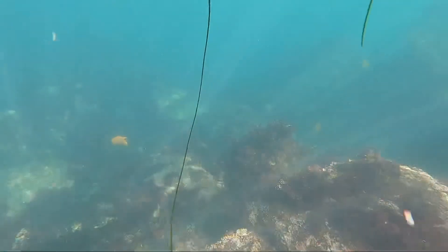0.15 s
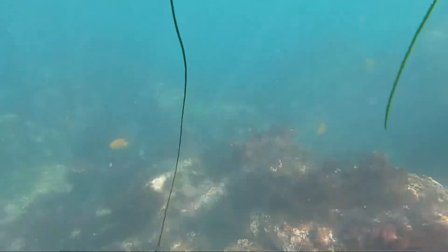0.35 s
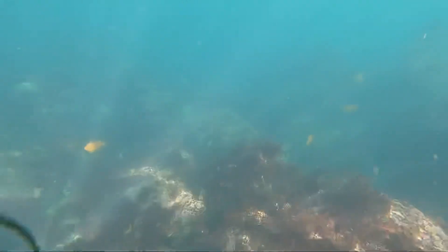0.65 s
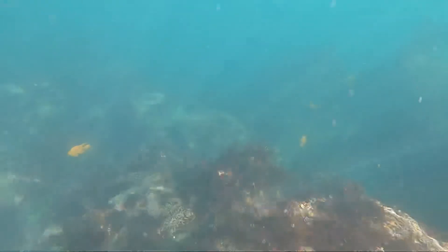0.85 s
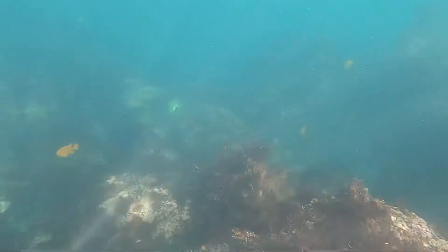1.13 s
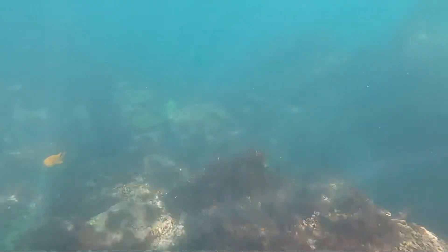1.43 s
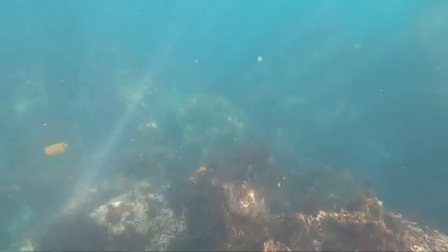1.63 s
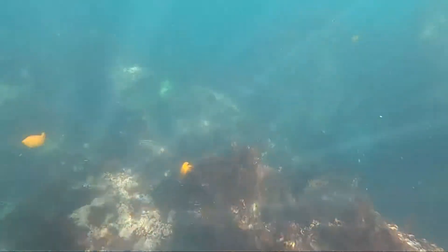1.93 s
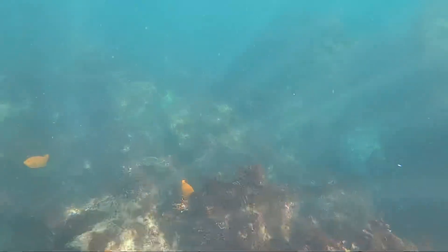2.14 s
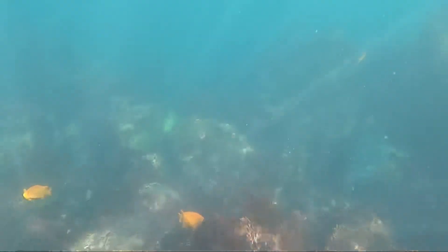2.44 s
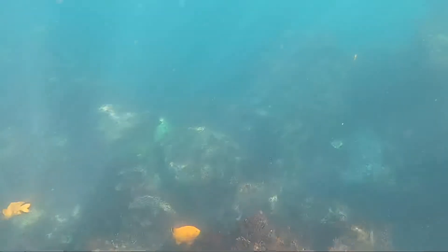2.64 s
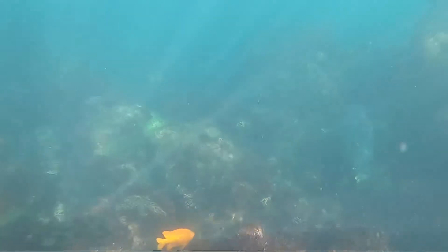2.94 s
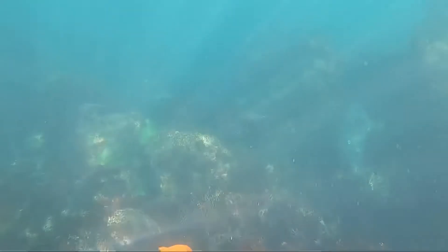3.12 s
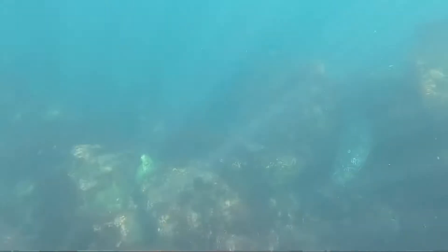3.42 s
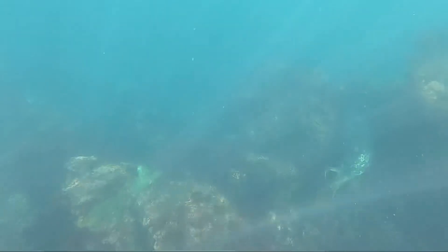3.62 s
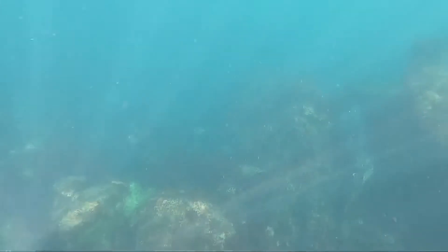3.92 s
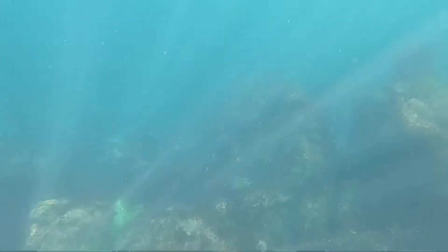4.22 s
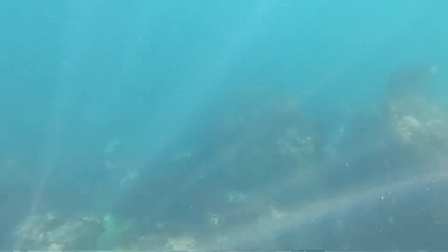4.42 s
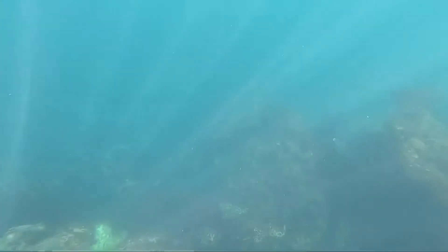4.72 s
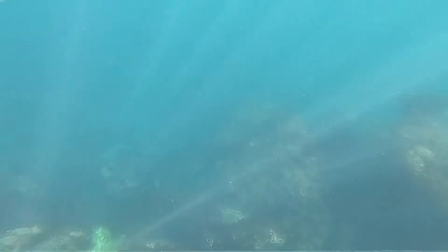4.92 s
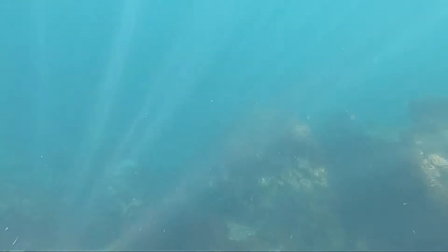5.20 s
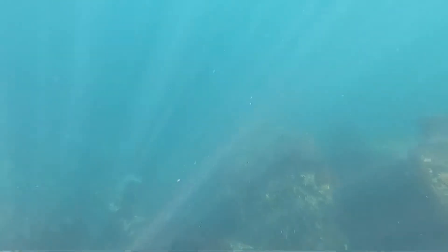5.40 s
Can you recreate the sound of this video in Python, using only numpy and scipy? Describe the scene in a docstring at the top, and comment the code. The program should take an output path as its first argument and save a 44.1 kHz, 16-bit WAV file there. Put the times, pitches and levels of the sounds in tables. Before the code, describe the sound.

A submerged camera in a sealed housing hears a rocky reef in muffled, slightly boxy stereo. A low, lumpy rumble of surging water and distant fish runs throughout, with soft slaps swelling against the shell. Over it lies a constant fine crackle of snapping shrimp, scattered with nearer, sharp dry clicks that ring briefly. From 0.27 to 0.45 s a hand knocks and scrapes the housing, the hardest bump at 0.45. Bright clicks burst near 0.77 s; small bumps and a soft rub follow at 0.95 and 1.4 to 2.0. Another rapid cluster of clacking knocks comes at 2.13 to 2.21. From about 1.54 s nearby fish give short, dull low thumps, irregular and frequent, with faint reef echoes; strong ones fall near 1.92, 3.56, 4.26, 5.03 and 5.41. Shrimp clicking grows dense from 3.2 s and keeps going until the end at about 5.5 s.

```python
"""Under water on a rocky reef, heard through the left and right ports of a sealed camera housing.
Surge and far fish rumble as shaped noise; near fish drum short low thumps, decaying sines with reef echoes.
A hand rubs and knocks the shell: grainy noise and single blows through resonances.
Snapping shrimp click near and far: pulses and sprays of noisy echoes that ring the housing."""
import sys
import numpy as np
from scipy import signal
from scipy.fft import rfft, irfft, next_fast_len
from scipy.io import wavfile
from scipy.ndimage import map_coordinates

SR = 44100
rng = np.random.default_rng(int(sys.argv[2]) if len(sys.argv) > 2 else 0)


def wav_out(sig):
    """Save sig, one row per channel (or a flat mono array), as 16-bit PCM at SR to the path in sys.argv[1]."""
    wavfile.write(sys.argv[1], SR, np.round(np.clip(np.atleast_2d(sig).T, -1, 1) * 32767).astype(np.int16))


def boost_factor(decibels):
    """Convert a level in decibels to a linear amplitude factor."""
    exponent = np.asarray(decibels, float) / 20
    return 10 ** exponent


N = 245195  # samples

# Water pushing on the housing and the far fish behind it: time_s, surge_db, drone_db
WATER_LEVELS = [(0.0, -28, -37), (0.23, -31.5, -44), (0.42, -24.5, -34.5), (0.84, -29, -34),
                (0.99, -28, -56.5), (1.16, -31, -42.5), (1.31, -35, -39), (1.45, -30.5, -36),
                (1.58, -31.5, -36.5), (1.95, -30, -36.5), (2.26, -33, -38.5), (2.49, -30, -39),
                (2.65, -32.5, -36), (3.13, -32.5, -40), (3.34, -30, -39.5), (3.58, -31.5, -43),
                (3.7, -37.5, -31), (3.82, -34.5, -38.5), (4.0, -32, -38), (4.24, -30.5, -38.5),
                (4.51, -31.5, -43), (4.77, -30, -44.5), (5.08, -34.5, -38), (5.31, -23, -36.5),
                (5.44, -33, -35.5), (5.56, -26, -43.5)]
# Spectrum of the surge, relative: freq_hz, density_db (per Hz)
SURGE_SPECTRUM = [(9, -25), (15, 1), (28, 6), (65, -1), (125, -3), (180, -23), (250, -23), (420, -120)]
# Shell resonances under a rubbing or knocking hand, for one of two passes: freq_hz, width_hz, relative_db
RUB_MODES = [(330, 105, 2), (519.6, 201, -0.5)]
# Higher shell resonances that rasp and clack, for one of two passes: freq_hz, width_hz, relative_db
RASP_MODES = [(620, 230, -3), (1000, 250, 0), (1600, 450, -5)]
SIDES = np.array([[1], [-1]])  # left port, right port


def unit(x):
    """Scale to rms 1."""
    return x / np.sqrt(np.mean(x ** 2) + 1e-20)


def along(points, hz):
    """Read (Hz, value) points on a log frequency axis."""
    f, v = np.transpose(points)
    return np.interp(np.log(hz + 1), np.log(f + 1), v)


def curves(rows):
    """One dB value per sample for each column after the time; -120 outside the rows."""
    s, *cols = np.transpose(rows)
    t = np.arange(N) / SR
    return np.array([np.interp(t, s, c, left=-120, right=-120) for c in cols])


def wobble(rate):
    """A smooth random curve, rate knots a second."""
    knots = rng.standard_normal(int(N * rate / SR) + 4)
    return map_coordinates(knots, [np.arange(N) * rate / SR])


def filtered(x, response):
    """Pass x through a complex response of frequency."""
    m = next_fast_len(N + 8192)  # room for the ringing
    return irfft(rfft(x, m) * response(np.fft.rfftfreq(m, 1 / SR)), m)[..., :N]


def modes(table):
    """Causal response of (Hz, width Hz, dB) resonances with alternating signs."""
    def response(f):
        total = 0
        for k, (c, w, db) in enumerate(table):
            total = total + (-1) ** k * boost_factor(db) * 1j * f * w / (c * c - f * f + 1j * f * w)
        return total
    return response


def steep(table):
    """The resonances passed twice, scaled so that one blow peaks at 1."""
    twice = lambda f: modes(table)(f) ** 2
    peak = np.abs(filtered(np.arange(N) == 0, twice)).max()
    return lambda f: twice(f) / peak


def blows(s, db):
    """A train of one-sample blows."""
    return np.bincount(np.round(s * SR).astype(int), boost_factor(db), N)[:N]


def surging():
    """Surge level in dB: a slow swell with short slaps of water on it."""
    # Slaps on the housing: crest_s, crest_db, half_length_s
    slap_rows = [(0.01, -24.5, 0.015), (0.164, -29, 0.029), (0.473, -24.5, 0.099), (0.565, -36.5, 0.019),
                 (0.867, -19.5, 0.041), (0.962, -19.5, 0.018), (1.604, -22.5, 0.036), (2.056, -25, 0.025),
                 (2.195, -18.5, 0.052), (2.504, -28, 0.034), (2.735, -27.5, 0.02), (2.87, -30.5, 0.052),
                 (3.047, -19.5, 0.018), (3.199, -24, 0.0059), (3.618, -29, 0.077), (3.8, -21.5, 0.0083),
                 (3.891, -29, 0.02), (4.015, -31, 0.015), (4.368, -31, 0.05), (4.537, -21, 0.018),
                 (4.619, -28.5, 0.012), (4.936, -23, 0.027), (5.202, -29, 0.017), (5.392, -29.5, .03),
                 (5.489, -22, 0.0088)]
    t = np.arange(N) / SR
    slaps = sum(boost_factor(db) * np.exp(-((t - s) / half) ** 2) for s, db, half in slap_rows)
    return 20 * np.log10(boost_factor(curves(WATER_LEVELS)[0]) + slaps)


def water():
    """Surge presses in lumps of low noise; far fish blur into a lumpy drone."""
    # Spectrum of the far fish, relative: freq_hz, density_db (per Hz)
    drone_spectrum = [(76, -18), (130, -4.5), (171, -11), (247, -2.5), (285, -2.5), (309, -8.5),
                      (380, -17.5), (632, -33.5), (1100, -33.5), (1430, -65), (2420, -120)]
    surge = boost_factor(1.54 * wobble(14)) * rng.standard_normal(N)
    surge = filtered(surge, lambda f: boost_factor(along(SURGE_SPECTRUM, f)))
    drone = boost_factor(3 * wobble(35)) * rng.standard_normal(N)
    drone = filtered(drone, lambda f: boost_factor(along(drone_spectrum, f)))
    return boost_factor(surging()) * unit(surge) + boost_factor(curves(WATER_LEVELS)[1]) * unit(drone)


def eddies():
    """Turbulence follows the surge and pushes the two ports in opposite directions."""
    push = filtered(rng.standard_normal(N), lambda f: boost_factor(along(SURGE_SPECTRUM, f)))
    return SIDES * boost_factor(surging() - 26.0) * unit(push)


def sliding():
    """Rub, rasp and hiss levels of the hand in dB: each stroke sets in, holds and fades."""
    # Strokes over the housing: start_s, length_s, rub_db, rasp_db, hiss_db
    strokes = [(0, 0.14, -43, -55, -76), (0.332, 0.32, -42.5, -45, -72), (0.408, 0.065, -35, -43, -53),
               (0.931, 0.025, -38, -46, -68), (1.457, 0.55, -39, -69, -48.5),
               (2.136, 0.081, -35, -49, -62.5), (2.447, 0.0056, -37, -45.5, -78),
               (2.564, .5, -53, -82, -81)]
    grip_db_per_s, let_go_db_per_s = 305.5, 172.5
    t = np.arange(N) / SR
    total = 0
    for s, length, *db in strokes:
        fade_db = grip_db_per_s * np.clip(s - t, 0, 1) + let_go_db_per_s * np.clip(t - s - length, 0, 1)
        total = total + boost_factor(np.c_[db] - fade_db)
    return 20 * np.log10(total)


def rubbing():
    """Skin drags over the shell in uneven grains, exciting low, middle and high resonances."""
    # Shell resonances that hiss, for one of two passes: freq_hz, width_hz, relative_db
    hiss_modes = [(1440, 170, 0), (1745, 70, 1)]
    grains = wobble(60)
    layers = zip(sliding(), [RUB_MODES, RASP_MODES, hiss_modes], [.08, .35, .3], [1.4, 3.5, .8])
    out = 0
    for db, table, apart, grain_db in layers:
        # apart is the share of noise that is opposite at the two ports
        noise = [[1, apart], [1, -apart]] @ rng.standard_normal((2, N))
        out = out + boost_factor(db) * unit(filtered(boost_factor(grain_db * grains) * noise, steep(table)))
    return out


def knocking():
    """A knock rings the shell, thuds late through its heavy body and clacks its chattering wall."""
    # Knocks on the housing: time_s, level_db, thud_db and clack_db (both relative to level_db)
    knock_rows = [(0.271, -21, -12, -8), (0.313, -23.5, 0, -19), (0.382, -17.5, 4, -32),
                  (0.419, -18.5, -1, -9), (0.448, -10.5, -6, -6.5), (0.703, -41, 9.5, 10),
                  (0.939, -43, 28.5, -8), (0.956, -23.5, 5, -2.5), (1.361, -31.5, 8, -26),
                  (1.409, -37, 19, -27), (1.425, -23, 5, -8.5), (1.468, -19.5, -13, -22),
                  (1.57, -24, 10, -50), (2.126, -21, 10, 1.5), (2.178, -19, -7, 0), (2.194, -20.5, 13, 4.5),
                  (2.21, -17, 4.5, -1), (2.45, -41, 24, 3), (3.339, -47, 0, 11), (3.499, -55, 1, 10),
                  (3.59, -52, 0, 10), (3.704, -55, 3, 8), (3.789, -37, 17.5, -26), (4.006, -33.5, 3.5, -28),
                  (4.514, -45, 30.5, -40), (4.753, -39, 16, -35), (4.896, -47.5, 15, 19.5),
                  (5.027, -25.5, 7, 2), (5.408, -27.5, 5, 5)]
    thud_lag_s = 0.00317
    rattle_db, rattle_t60_s = -17.5, 0.021
    s, db, thud_db, clack_db = np.transpose(knock_rows)
    thud = filtered(blows(s + thud_lag_s, db + thud_db), steep([(109.6, 108, 0)]))
    knock = filtered(blows(s, db), steep(RUB_MODES))
    clack = blows(s, db + clack_db)
    chatter = boost_factor(rattle_db - 60 * np.arange(SR // 40) / SR / rattle_t60_s)
    rattle = signal.fftconvolve(clack, chatter)[:N] * rng.standard_normal(N)
    clack = filtered(clack + rattle, steep(RASP_MODES))
    soft_contact = lambda f: 1 / (1 + 1j * f / 2300) ** 4  # takes off the treble
    return -filtered(thud + knock + clack, soft_contact)


def fish():
    """Each near thump is one twitch of a swim bladder: a few cycles that swell and die."""
    # Near thumps: start_s, level_db, pitch_hz
    thump_rows = [(0.678, -36, 235), (1.148, -28, 229), (1.392, -25.5, 176), (1.539, -10, 269),
                  (1.829, -19, 220), (1.918, -9.5, 236), (1.978, -30, 312), (2.073, -14, 250),
                  (2.239, -15, 260), (2.429, -12.5, 191), (2.576, -23, 210), (2.626, -28, 276),
                  (2.706, -12.5, 238), (2.756, -28, 260), (2.927, -18, 193), (2.993, -26, 296),
                  (3.042, -16, 234), (3.183, -14.5, 242), (3.328, -14.5, 235), (3.556, -6.5, 244),
                  (3.602, -26, 228), (3.637, -16.5, 198), (3.646, -14, 251), (3.704, -20.5, 256),
                  (3.73, -26.5, 256), (3.829, -26, 248), (3.865, -26.5, 240), (4.086, -33, 283),
                  (4.178, -24.5, 255), (4.255, -10.5, 235.4), (4.318, -29, 200), (4.388, -13.5, 248),
                  (4.538, -15.5, 252), (4.607, -23.5, 213), (4.94, -12.5, 258), (5.029, -6.5, 178.6),
                  (5.139, -21.5, 256), (5.241, -26.5, 268), (5.344, -26.5, 260), (5.41, -8, 209),
                  (5.45, -23, 179)]
    out = np.zeros(N + SR)
    t = np.arange(SR // 20) / SR - .0053  # zero at the crest
    rise = np.exp(-(t / 0.0034) ** 2)
    fall = 0.62 * np.exp(-(t / 0.0027) ** 2) + 0.36 * np.exp(-t / 0.011)
    swell = np.where(t < 0, rise, fall) * np.minimum(np.arange(len(t)) / 90, 1)
    for s, db, hz in thump_rows:
        out[round(s * SR):][:len(t)] -= boost_factor(db) * swell * np.sin(2 * np.pi * hz * t)
    return out[:N]


def reef(x):
    """Thumps come back off the reef as a dying spray of echoes."""
    echo_db, echo_t60_s = -14.5, 0.11
    t = np.arange(SR // 2) / SR
    tail = boost_factor(-60 * t / echo_t60_s) * np.minimum(t / 0.0033, 1) * rng.standard_normal(len(t))
    return boost_factor(echo_db) * signal.fftconvolve(x, tail / np.linalg.norm(tail))[:N]


def far_crackle():
    """Times, levels and colours of 1000 far snaps, and the gain of the hiss the farthest merge into."""
    # Far crackle: time_s, base_db
    crackle_rows = [(0.0, -57), (0.17, -54.5), (0.56, -57.5), (0.74, -57.5), (0.94, -57), (1.31, -53.5),
                    (1.45, -53), (1.84, -54), (2.12, -54.5), (2.52, -57), (3.08, -54.5), (3.24, -50.5),
                    (3.41, -51), (3.83, -57), (4.55, -52.5), (4.81, -52.5), (5.1, -54), (5.56, -53)]
    base_db = curves(crackle_rows)[0]
    chance = rng.random((1000, 3))
    far_s = chance[:, 0] * (N - 1) / SR
    clumped_db = base_db + 1.5 * wobble(7)  # louder and softer clusters
    far_db = clumped_db[np.round(far_s * SR).astype(int)] - 6.4 * np.log(chance[:, 1] + 0.025)
    far_hz = 1200 * 9 ** chance[:, 2]  # rocks and distance give every far snap its own colour
    bed = boost_factor(base_db - 18.5 + 1.5 * wobble(12))
    return far_s, far_db, far_hz, bed


def two_ports(noise, near):
    """Noise reaches the ports partly alike, depending on frequency; near clicks are added to both parts."""
    # Left-right likeness of the noise: freq_hz, likeness (-1 to 1)
    likeness = [(800, 0.49), (1500, 0.4), (3000, 0.13), (6000, 0.42), (9000, 1), (12500, 1)]
    turn = lambda f: np.arccos(np.clip(along(likeness, f), -1, 1)) / 2
    parts = noise + np.array([[1.3], [.7]]) * near
    shared, apart = filtered(parts, lambda f: np.array([np.cos(turn(f)), 1j * np.sin(turn(f))]))
    return np.array([shared + apart, shared - apart])


def ring(x, group):
    """One group of housing resonances at each port, scaled so that a blow peaks at 1 on average."""
    ports = [modes([(hz, w, port_db[side]) for hz, w, *port_db in group]) for side in range(2)]
    low_hz, top_hz = .8 * group[0][0], 1.15 * group[-1][0]  # the shell passes little outside
    edge = lambda u: 1 / (1 - u * u + 1.25j * u) ** 3
    both = lambda f: np.array([p(f) for p in ports]) * edge(-low_hz / (f + 1)) * edge(f / top_hz)
    peak = np.abs(filtered(np.arange(N) == 0, both)).max(axis=1).mean()
    return filtered(x, both) / peak


def shrimp():
    """Each snap is a click (too faint when far) and a spray of echoes off the rocks, ringing the housing."""
    # Near snaps: start_s, low_db, middle_db, high_db, top_db (one per resonance group),
    # late_db (late echoes, relative to each group's level)
    snaps = [(0.026, -46, -32, -29.5, -53, -35), (0.127, -35.5, -19.5, -20, -55.0, -42.5),
             (0.3175, -40.5, -50, -90.0, -77.5, -18.5), (0.3477, -56, -38, -47.5, -61.5, -25),
             (0.3964, -34, -37.5, -49.5, -66.5, -19), (0.4176, -39, -90.0, -89, -69, -34.0),
             (0.425, -36.5, -46, -41, -90.0, -26.5), (0.4373, -87, -42, -90.0, -73, -14.5),
             (0.4484, -35, -35, -36.0, -62, -27), (0.468, -88, -38, -43.5, -71, -27),
             (0.5068, -35, -37, -43, -59, -29), (0.5814, -53.5, -40, -34, -59, -36.5),
             (0.6656, -41, -41, -50, -71, -19), (0.7042, -36, -45.5, -56, -74.5, -34.0),
             (0.7662, -20.5, -20, -29, -52.5, -34), (0.776, -29, -90.0, -64, -90.0, -22),
             (0.7876, -24, -23.5, -21, -63, -25.5), (0.9016, -49, -43, -39, -65, -24),
             (0.9172, -51, -32.5, -40.5, -70, -26.5), (0.9292, -30, -28, -29.5, -54.5, -26.5),
             (0.9604, -36, -36, -43, -86.5, -37), (1.0474, -57, -38, -40.0, -61, -24),
             (1.058, -50, -44, -36, -62.5, -35.5), (1.065, -90.0, -52, -44, -57.5, -34.0),
             (1.2815, -24, -21.0, -39, -64, -31.0), (1.4424, -59, -32.5, -40.5, -65, -22),
             (1.4587, -51, -47, -41, -66, -39), (1.4839, -25, -29, -27.5, -59, -23.5),
             (1.557, -39, -36, -46, -76.0, -31), (1.5737, -44, -35.5, -43, -64, -21),
             (1.5885, -33, -33.5, -60, -68, -21), (1.6039, -35.5, -30, -34.5, -56, -32),
             (1.7418, -39, -38, -42.5, -71, -29), (1.7728, -34.5, -37, -56, -90.0, -33),
             (1.8306, -38, -51, -48, -81, -34.0), (1.8577, -43.5, -60, -58, -76, -23.0),
             (1.917, -40, -42, -51, -73.5, -20), (1.9554, -51, -30, -33.5, -65.5, -27),
             (1.9709, -44, -43, -49, -86, -32), (1.989, -44.0, -39, -57, -82, -33),
             (2.0062, -44, -34.5, -49.5, -71, -28), (2.0285, -39, -50, -49, -59.5, -37),
             (2.049, -39, -31.5, -57, -71.5, -25), (2.0775, -40.5, -38.0, -55, -76, -23),
             (2.1112, -41, -37, -52.5, -63, -16.0), (2.1292, -33.5, -35, -48, -67, -41),
             (2.133, -47, -57, -52, -54, -33), (2.164, -20.5, -24, -25.5, -52.0, -35.5),
             (2.1772, -29, -90.0, -90.0, -90.0, -31), (2.1943, -37, -48, -49.5, -73, -37),
             (2.2134, -32.5, -25.5, -38.5, -90.0, -41), (2.3696, -85, -45, -48, -62.5, -22),
             (2.4546, -34.5, -38, -67, -75, -35), (2.5136, -67, -38.5, -40.5, -67.5, -40),
             (2.5456, -46, -41, -41, -59.5, -18.0), (2.749, -89, -47.0, -50, -62, -37),
             (2.8027, -39.0, -31.5, -39.5, -78, -24.5), (2.8553, -16.5, -33.5, -39, -61.0, -26),
             (2.8757, -37, -52.0, -90.0, -88.0, -34.0), (2.888, -43.0, -46, -44, -78.5, -41),
             (2.9982, -52.0, -33, -33.5, -67, -34.0), (3.0285, -90.0, -49, -44, -59.5, -16.5),
             (3.0522, -49, -42, -38.5, -61, -22), (3.077, -44, -37, -90.0, -92, -20.0),
             (3.108, -47, -42, -43.5, -78, -21.5), (3.1148, -57, -47, -40.5, -60, -18.5),
             (3.1216, -90.0, -46, -35, -59, -31), (3.1448, -34.0, -33.5, -49, -61, -34.0),
             (3.277, -28, -34.5, -42.5, -65, -21.5), (3.3044, -35, -41, -44, -70.0, -28.0),
             (3.338, -30, -31.5, -40.5, -71, -25), (3.376, -28, -35.5, -50.5, -68, -26.5),
             (3.3877, -37.0, -35, -45, -71.0, -32), (3.431, -39.5, -41, -52, -69.0, -28.5),
             (3.4637, -52, -38.5, -58, -91, -21.5), (3.477, -42, -32, -48.5, -67.5, -34.0),
             (3.523, -27.5, -27.5, -35.5, -57, -23.5), (3.5322, -32.5, -32, -26.5, -48.5, -31),
             (3.5527, -39.5, -34, -34, -54.0, -31), (3.5964, -43, -35, -47, -63.5, -19.5),
             (3.6186, -39, -32, -49, -67, -34.0), (3.625, -88, -38, -37, -57.5, -40),
             (3.642, -61, -44, -42, -65.5, -35), (3.7031, -37.5, -58, -46, -78.5, -17.5),
             (3.7507, -39.5, -45, -36, -64, -32), (3.7914, -63, -55, -33, -69, -25),
             (3.848, -55, -35, -38.5, -90.0, -25), (3.9105, -55, -31, -36.5, -67, -26),
             (3.9854, -52, -36, -43, -74.5, -28), (4.1015, -48, -29.5, -38.5, -63, -28.5),
             (4.1093, -90.0, -53, -50.5, -64, -19), (4.114, -90.0, -36, -36, -58.5, -24.5),
             (4.131, -39, -36, -42, -60.5, -22), (4.1537, -40, -32, -42, -69.5, -22.5),
             (4.1706, -90.0, -28.5, -52, -65.5, -21), (4.1937, -24, -29, -27.5, -55, -23),
             (4.264, -42.5, -32, -33, -56, -30), (4.3241, -38.5, -40, -37.5, -70, -31),
             (4.3496, -52, -44, -52, -56, -39), (4.4107, -74, -67, -45, -60, -28),
             (4.4362, -68, -55, -39.5, -59, -26), (4.5339, -52, -37.5, -34.5, -52, -34.0),
             (4.6589, -30.5, -23.5, -41, -59.5, -19.0), (4.6702, -90.0, -23.5, -33, -59, -26),
             (4.7075, -48, -48, -48, -57, -22.5), (4.7176, -46.0, -28.5, -27.5, -52.5, -36),
             (4.763, -90.0, -41, -35.5, -60, -26), (4.7985, -50.5, -35, -50.5, -87, -21),
             (4.8147, -45, -32.5, -35, -75, -26.5), (4.8278, -53, -42, -33, -51.5, -32.5),
             (4.884, -46, -37, -39.5, -60.5, -18), (4.8959, -18.5, -26.5, -42.5, -58, -27),
             (4.9115, -36, -90.0, -90.0, -90.0, -27), (4.926, -39, -42, -40, -62, -29.5),
             (4.9506, -47.5, -43, -44, -90.0, -35), (4.9898, -44, -31.5, -40.5, -60.5, -33.5),
             (5.0162, -90.0, -45, -35, -59.5, -18.5), (5.0277, -19, -44, -42.0, -63, -26),
             (5.1539, -44, -31.5, -36, -62, -27), (5.243, -90.0, -36.0, -46, -71.5, -37),
             (5.3556, -42, -39.5, -36.5, -67, -38.5), (5.4082, -30.5, -53, -42, -59, -22.5),
             (5.4395, -38, -33, -48.5, -90.0, -24), (5.4784, -32.5, -48, -43, -66, -38),
             (5.5117, -23.5, -26, -34, -54, -23)]
    # Housing resonances in four groups, relative: freq_hz, width_hz, left_db, right_db
    housing = [
        [(1403, 260, 12.5, 6), (2180, 620, -6.5, -10)],
        [(2564, 810, 6, -15), (3726, 800, 1, 4)],
        [(4400, 740, 2, 11), (5630, 1580, 3.5, -1.5), (7770, 1400, -9, -27)],
        [(9470, 1400, 2, -3.5), (12900, 1800, -1, -6.5)],
    ]
    claw_db, claw_s = -26.5, 0.0013  # the closing claw ticks softly just before its bubble bursts
    bounce_db, bounce_s = -3, .0028  # returns off the nearest rocks, within this time
    s, *ring_db, late_db = np.transpose(snaps)
    burst_s = s + claw_s
    far_s, far_db, far_hz, bed = far_crackle()
    rasp = boost_factor(sliding()[1] - 31)  # a rasping hand shakes all but the top group too
    t = np.arange(SR // 16) / SR
    early, late = boost_factor(-20.0 - 60 * t / 0.0059), boost_factor(-60 * t / 0.063)
    out = 0
    for k, (group, far_gain_db) in enumerate(zip(housing, [-0.5, 2.5, -2.5, -20.5])):
        near = blows(burst_s, ring_db[k]) + blows(s, ring_db[k] + claw_db)
        lag_s = bounce_s * rng.random((len(s), 2)) ** 2
        near = near + blows(burst_s + lag_s[:, 0], ring_db[k] + bounce_db)
        near = near - blows(burst_s + lag_s[:, 1], ring_db[k] + bounce_db)
        colour_db = -32 * np.log2(far_hz / group[0][0]) ** 2
        distant = blows(far_s, far_db + far_gain_db + colour_db)
        late_blows = blows(burst_s, ring_db[k] + late_db) + boost_factor(-22) * distant
        echoes = signal.fftconvolve(near + distant, early) + signal.fftconvolve(late_blows, late)
        steady = boost_factor(far_gain_db) * (boost_factor(2.03 * wobble(25)) * bed + rasp * (k < 3))
        noise = (echoes[:N] + steady) * rng.standard_normal((2, N))
        out = out + ring(two_ports(noise, near), group)
    return out


def scene():
    """Low sounds reach both ports nearly alike through the shell; the shrimp are added over them."""
    # Sounds carried by the shell: freq_hz, left_over_right_db
    tilt = [(40, 1.6), (100, .7), (300, .4), (800, -1), (1400, 6)]
    thumps = fish()
    low = water() + eddies() + rubbing() + knocking() + thumps + reef(thumps)
    return filtered(low, lambda f: boost_factor(SIDES * along(tilt, f) / 2)) + shrimp()


def roll_off(x):
    """The treble ends steeply here."""
    return signal.sosfilt(signal.butter(12, 15500, fs=SR, output="sos"), x)


def record(dry):
    """The ports hear less in two bands, and the left hears a little later than the right."""
    # Dips of the ports: freq_hz, narrow_width_hz, wide_width_hz (depth is narrow over wide)
    dips = [(1200, 140, 320), (2280, 250, 600)]
    # Phase between the ports: freq_hz, left_lead_radians (negative: left is later)
    lead = [(50, -.1), (300, -.05), (700, -.4), (1300, -1.0), (2500, -1.7), (3500, -1.5), (5000, -2.2),
            (6500, -2.2), (9000, -1.2), (12500, -.5)]

    def hearing(f):
        response = np.exp(.5j * SIDES * along(lead, f) * (f > 0))
        for hz, narrow, wide in dips:
            response = response * (hz * hz - f * f + 1j * f * narrow) / (hz * hz - f * f + 1j * f * wide)
        return response

    return roll_off(filtered(dry, hearing))


dry = scene()
out = record(dry)
wav_out(out)
```